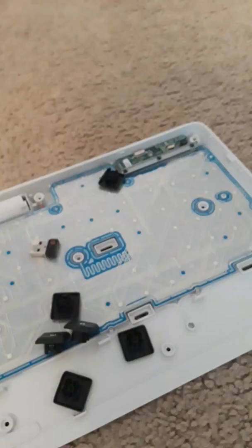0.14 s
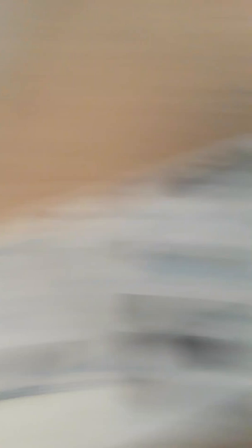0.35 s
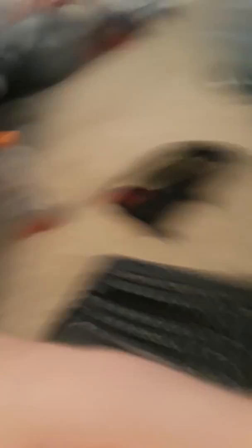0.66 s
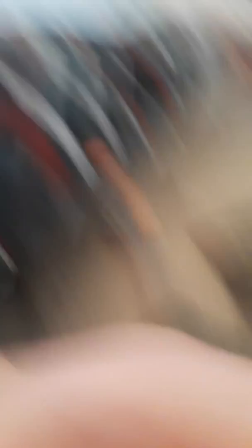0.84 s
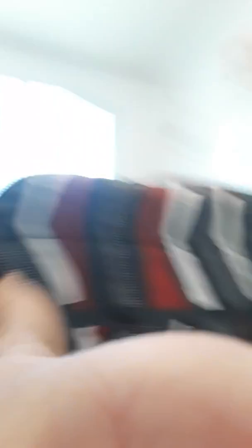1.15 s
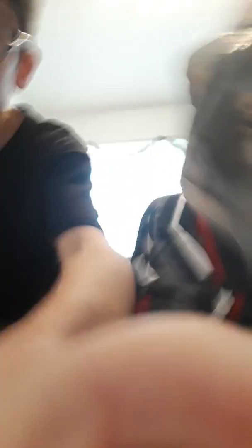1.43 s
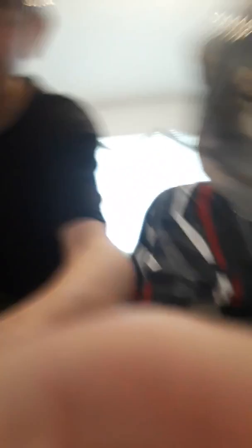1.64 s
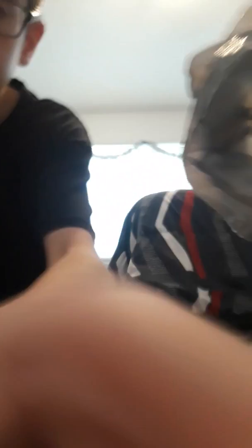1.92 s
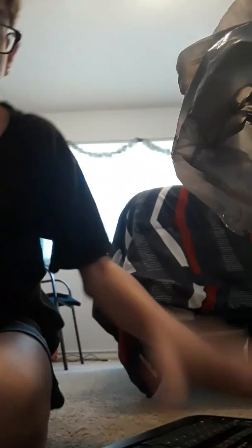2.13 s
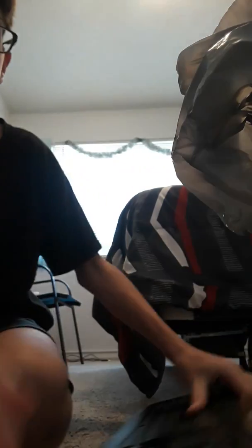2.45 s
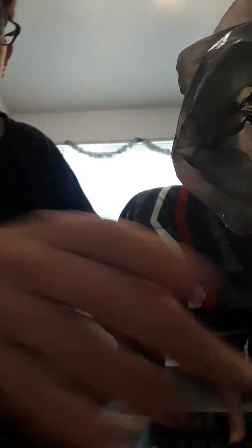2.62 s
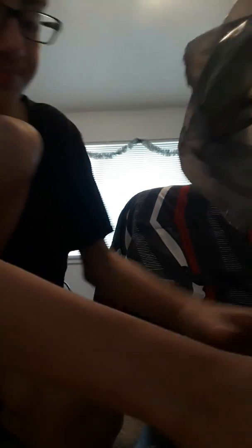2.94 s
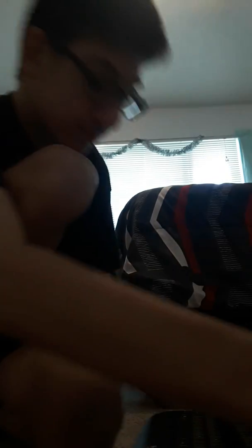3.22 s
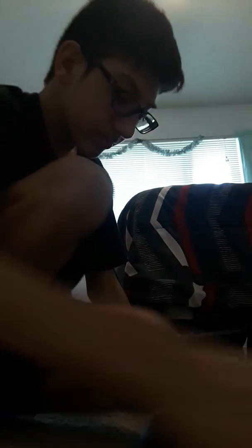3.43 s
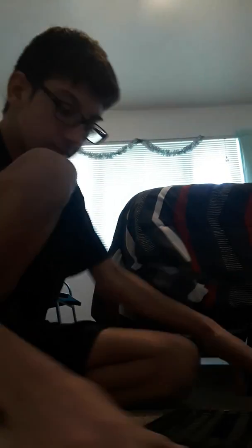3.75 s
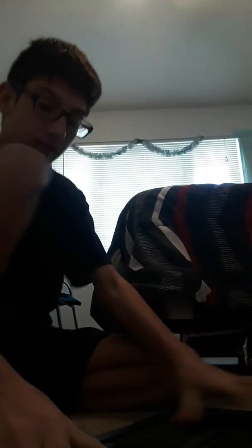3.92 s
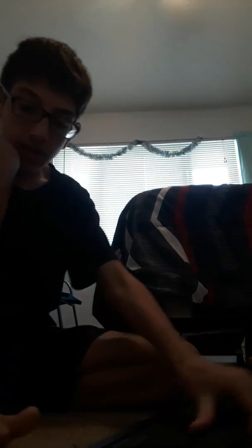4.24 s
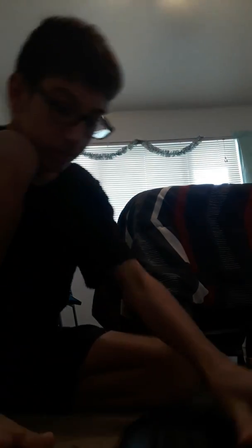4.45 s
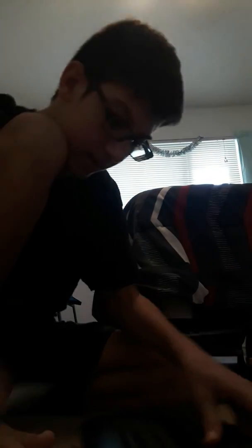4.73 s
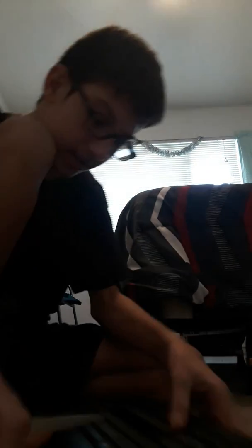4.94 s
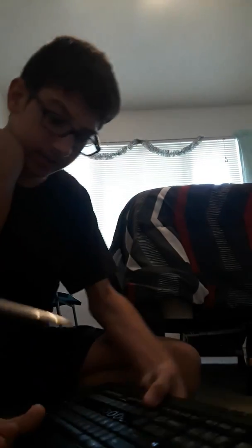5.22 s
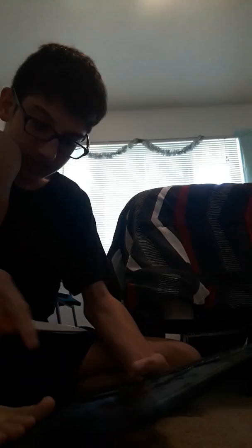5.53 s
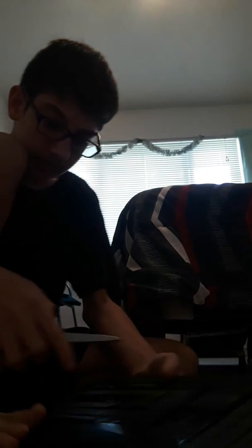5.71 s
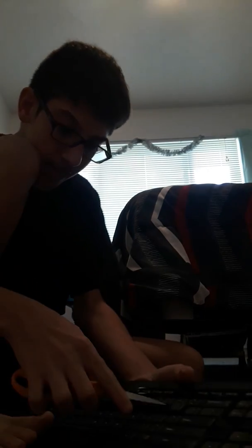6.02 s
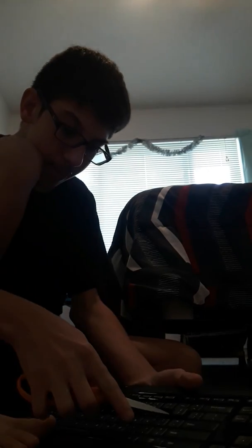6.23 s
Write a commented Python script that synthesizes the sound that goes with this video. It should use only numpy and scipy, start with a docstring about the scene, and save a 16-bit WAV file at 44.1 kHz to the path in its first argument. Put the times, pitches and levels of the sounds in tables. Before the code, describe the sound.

Close stereo sound of a loose-keyed keyboard on a bedroom floor: light plastic clicks, then a sharp bang and bright shower of rattles, a lull of small taps over soft rumble, another strong clatter with floor thumps, a run of fading ticks, a medium knock with a short rattle, and finally a short, dry scrape of a blade against a key. Short, dull room echoes.

```python
"""A low room rumble and soft hiss are there from the start, with a first plastic click almost at once.
A plastic keyboard is handled, set down and dragged over a carpet in a small bedroom; a cap is pried at.
Rumble and hiss are coloured noise. Each contact clicks a cap and knocks the ringing case; jolts rattle
the loose caps as showers of tiny collisions. Dull thumps come through the floor, and near the end a
blade scrapes briefly as dense noise. Two microphone ports a few centimetres apart hear it in stereo."""
import sys
import numpy as np
from scipy import signal
from scipy.fft import rfft, irfft
from scipy.io import wavfile

SR = 44100
rng = np.random.default_rng(int(sys.argv[2]) if len(sys.argv) > 2 else 0)


def to_wav(s):
    """Save 16-bit WAV."""
    ch = np.atleast_2d(s).T  # columns
    pcm = np.round(np.clip(ch, -1, 1) * 32767)  # PCM
    wavfile.write(sys.argv[1], SR, pcm.astype(np.int16))


N = 280917   # length in samples


def amp(db):
    """Turns a level in dB into a gain."""
    return 10 ** (np.asarray(db) / 20)


def rms_one(x):
    """Scales a sound to an average power of one."""
    return x / np.sqrt(np.mean(x ** 2) + 1e-20)


def at_hz(points, hz):
    """Reads a frequency table between its points, with octaves equally wide."""
    table = np.array(points)
    return np.interp(np.log(np.maximum(hz, 1)), np.log(table[:, 0]), table[:, 1])


def filtered(x, order, hz, kind):
    """Keeps the low, high or middle band of a sound."""
    return signal.sosfilt(signal.butter(order, hz, kind, fs=SR, output="sos"), x)


def shaped(x, points):
    """Colours a sound by a dB table without smearing it ahead in time (minimum phase, unit power gain)."""
    size = 2048
    cepstrum = irfft(np.log(amp(at_hz(points, np.fft.rfftfreq(size, 1 / SR)))))
    # folding the second half onto the first makes the filter act as early as it can
    cepstrum[1:size // 2] *= 2
    cepstrum[size // 2 + 1:] = 0
    taps = irfft(np.exp(rfft(cepstrum)))
    return signal.oaconvolve(x, taps[None] / np.sqrt(np.sum(taps ** 2)), axes=1)[:, :N]


def sides(pan_db):
    """Gives left and right gains; a positive level difference favours the left."""
    return amp(np.array([[.5], [-.5]]) * pan_db)


def drift(rate):
    """Wanders slowly by chance: random points, so many per second, joined by lines."""
    knots = rng.standard_normal(2000)
    return np.interp(np.arange(N) * rate / SR, np.arange(len(knots)), knots)


# Colour of the rumble: [f/Hz, level/dB per Hz, relative]
RUMBLE_COLOUR = [(15, -52), (25, -31), (48, -16.5), (156, -2.5), (200, -6.5), (252, -2.5), (318, -1),
                 (417, -9.5), (578, -16), (715, -19.5), (2500, -62.5), (3250, -86), (5500, -120)]
# How far the rumble leans to one side: [f/Hz, left-right level/dB]
RUMBLE_SIDE = [(60, 2), (150, -0.5), (380, -4.5), (950, -13.5), (2380, 7), (5980, 0.5), (15000, -3.0)]
# How alike the two ports hear it: [f/Hz, likeness from 1 (same) through 0 (unrelated) to -1 (opposite)]
RUMBLE_LIKENESS = [(60, 0.91), (300, 1), (640, 0.2), (1400, -0.093), (3000, 0.01)]
# Slow course of the rumble: [t/s, level/dB]
RUMBLE_COURSE = [(0.0, -49), (0.74, -47.5), (1.1, -50.5), (1.58, -55), (2.31, -55.5), (2.52, -50.5),
                 (3.95, -48.5), (4.38, -50), (5.45, -48.5), (6.37, -49)]


def rumble():
    """Low noise of the house in half-octave bands, each with its own flicker, lean and likeness."""
    out = 0
    edges = 25 * 2 ** np.arange(0, 7, .5)
    white = rng.standard_normal((2, 2, N))
    for k, (low, high) in enumerate(zip(edges, edges[1:])):
        common, opposite = filtered(white[k % 2], 2, [low, high], "band")   # neighbours use other noise
        hz = np.sqrt(low * high)
        alike = np.clip(at_hz(RUMBLE_LIKENESS, hz), -1, 1)
        pair = np.sqrt(1 + alike) * common + np.sqrt(1 - alike) * opposite * [[1], [-1]]
        flicker_db = 3.1 * drift(17.0)
        gain = amp(at_hz(RUMBLE_COLOUR, hz) + flicker_db) * sides(at_hz(RUMBLE_SIDE, hz))
        out = out + gain * pair
    level_db = np.interp(np.arange(N) / SR, *np.transpose(RUMBLE_COURSE))
    return amp(level_db) * rms_one(out)


# Colour of the microphone hiss: [f/Hz, level/dB per Hz, relative]
HISS_COLOUR = [(880, -41), (1500, -9.5), (1590, -9), (3280, -14.5), (9370, -15.5), (12200, 0), (13400, -24),
               (14800, -7), (16000, -37.5)]


def hiss():
    """Steady coloured microphone noise, unrelated at the two ports."""
    return amp(-68.5) * shaped(rng.standard_normal((2, N)), HISS_COLOUR)


def ring(x, hz, t60):
    """Lets a push ring like a struck bar: a unit click starts a fading sine of height 1."""
    r, w = amp(-60 / (t60 * SR)), 2 * np.pi * hz / SR
    return signal.lfilter([0, np.sin(w)], [1, -2 * r * np.cos(w), r * r], x + 1e-18)


def add(track, s, shape):
    """Adds a stereo shape from time s on."""
    i = int(np.clip(round(s * SR), 0, N - 1))
    track[:, i:i + shape.shape[1]] += shape[:, :N - i]


def swell(rise, hold, t60):
    """Rises, holds, then fades by 60 dB in t60 seconds."""
    t = np.arange(SR // 3) / SR
    return np.clip(t / rise, 0, 1) * amp(-60 * np.maximum(t - rise - hold, 0) / t60)


BOARD_PAN_DB, CASE_PAN_DB = 4, -1   # the board lies to the left; the case rings a little stronger right
# Ringing modes of the case: [f/Hz, level/dB, fade by 60 dB/s]
CASE_MODES = [(361, -2.5, 0.042), (459, -2.5, 0.023), (550, -3, 0.034), (666, -5, 0.031), (761, 5, 0.024),
              (899, -2, 0.039), (1102, -8, .02), (1450, -0.5, 0.0027)]
# Contacts with the board: [t/s, click level/dB, knock level/dB, bright part level/dB over the click,
# chatter level/dB over the click, knock centre f/Hz, cap note f/Hz]
TOUCHES = [(0.0034, -32, -41, -13, -4.5, 890, 2820), (0.0874, -28.5, -34.5, -3.5, -12, 930, 7100),
           (0.105, -26, -34, -24, -4.5, 1360, 2180), (0.137, -31, -32, 1, -9, 940, 2160),
           (0.1556, -22.5, -39, -10, -19, 867, 1930), (0.2604, -28, -25.5, -14, -0.5, 550, 2400),
           (0.373, -39, -52, -20, -16, 533, 2400), (0.477, -24.5, -28.5, -6.5, -12, 700, 1360),
           (0.5125, -22, -31, -9, -22.5, 520, 5240), (0.5533, -32.5, -33, -17, -14, 810, 1420),
           (0.6459, -54, -48, -7, -10, 799, 1530), (0.7031, -42, -22.5, -10, 3, 604, 1290),
           (0.718, -26.5, -40, -30, -6, 743, 2200), (0.758, -10, -32, -0.5, -19.5, 830, 8320),
           (0.845, -19, -30, -35, -24, 950, 1580), (0.8927, -23, -38.5, -9, -11, 786, 7800),
           (0.907, -26.5, -41, 1, -13, 805, 6650), (0.9286, -35.5, -37.5, -21, -1, 880, 2270),
           (1.0154, -36.5, -53, -11, -11, 511, 2100), (1.0415, -26, -42, -6.5, -10.5, 610, 8150),
           (1.0767, -4.5, -16.5, -20, -15, 400, 8500), (1.0875, -8.5, -30, -20, -6.5, 560, 4410),
           (1.096, -13, -18, -8, -18, 400, 4500), (1.1318, -13.5, -33, -4, -4, 431, 6550),
           (1.138, -15, -17, -5, -20, 450, 7000), (1.243, -17, -30.5, 0.5, -24, 800, 6860),
           (1.354, -22.5, -37, -19, -9, 867, 1300), (1.3681, -26.5, -39.5, 6, -14.5, 945, 7050),
           (1.3942, -21.5, -41, -0.5, -40, 760, 6640), (1.49, -39, -44, -15, -11, 410, 2630),
           (1.524, -39.5, -34, -14, -9, 390, 2480), (1.5424, -44, -70, -2.5, -7, 506, 1610),
           (1.5725, -27.5, -44, -4.5, -17, 886, 8300), (1.639, -32, -58, -15, -11, 1140, 2210),
           (1.935, -34.5, -37.5, -21, -8.5, 738, 1560), (1.988, -39, -44, -23, -14, 775, 1300),
           (2.2563, -46.5, -46.5, -1.5, -9, 860, 5000), (2.408, -53.5, -44.5, -7, -10, 900, 1300),
           (2.4843, -43, -38.5, -10, -7, 805, 1640), (2.5135, -37, -40.5, -18, -5.5, 748, 2260),
           (2.5264, -36.5, -32.5, -24, -6, 563, 1820), (2.81, -49.5, -53, -14, -6, 874, 2160),
           (2.8253, -38, -37, -8, -12, 856, 2150), (3.274, -36.5, -34.5, -19, -5.5, 744, 1280),
           (3.317, -42, -41, -15, -16, 810, 1320), (3.344, -35.5, -42, -5, -16, 560, 4640),
           (3.356, -35, -29.5, -27, -6, 625, 2140), (3.4585, -43.5, -52, -3.5, -7.5, 423, 4070),
           (3.5992, -25, -48, 0, -26, 676, 4450), (3.6134, -31.5, -49, -9, -6, 430, 4100),
           (3.638, -25.5, -37, -8, -7.5, 813, 5600), (3.678, -14, -15.5, -17, 2, 460, 2100),
           (3.735, -13, -20.5, 3.5, -21, 600, 7100), (3.755, -9, -29.5, -1, -28.5, 800, 7560),
           (3.859, -14, -29.5, -1, -16, 709, 6500), (3.9171, -35, -38, -11, -20, 740, 5220),
           (3.9632, -23.5, -37.5, -2, -15.5, 845, 7050), (4.0269, -25.5, -47, -9, -24, 1100, 4550),
           (4.059, -24.5, -40.5, -9.5, -10.5, 804, 2420), (4.0858, -25, -36.5, -11, -10.5, 805, 2310),
           (4.093, -24, -42, -12, -17, 800, 4970), (4.134, -33, -44, -12, -11.5, 525, 8000),
           (4.1664, -24.5, -40, -13, -14, 880, 5030), (4.1732, -21, -32, -11, -12, 770, 2220),
           (4.207, -20, -43, -5, -20, 864, 5410), (4.2434, -27, -39, -7.5, -9.5, 880, 8060),
           (4.3133, -27.5, -42, -26, -15, 1210, 1770), (4.3352, -26, -32.5, -35, -10, 755, 1510),
           (4.351, -41, -35.5, -20, -5.5, 600, 1500), (4.3924, -43.5, -49, -13, -0.5, 487, 1370),
           (4.4926, -53, -52, -2, -5.5, 550, 1350), (4.7222, -24.5, -38, -5.5, -16, 721, 2430),
           (4.8585, -39.5, -71, -6.5, -11.5, 460, 8450), (4.9468, -21.5, -34.5, -16, -10.5, 740, 3260),
           (5.034, -17, -32, -11.5, -18.5, 460, 4760), (5.2626, -38, -47, -27, -4.5, 1146, 1324),
           (5.274, -39.5, -46, -10, -8, 1200, 2490), (5.291, -26, -43, -25, -19, 1300, 1400),
           (5.2994, -24, -36, -31, -18, 1330, 1340), (5.329, -26, -31, -29, -19, 1405, 1400),
           (5.3654, -19, -20, -11, -3, 423, 2500), (5.4007, -28, -46, -10.5, -26.5, 956, 7660),
           (5.409, -25, -36, -8, -27, 800, 3000), (5.425, -17, -34, 2, -24, 850, 6100),
           (5.5557, -32.5, -52.5, -10, -8.5, 435, 2600), (5.567, -36.5, -57, -8, -8, 435, 2320),
           (5.641, -44.5, -57.5, -10, -11.5, 537, 2350), (5.7392, -43, -51, 10.5, -15, 425, 8800),
           (5.7808, -34, -46.5, 1, -8, 560, 2280), (5.795, -32.5, -50, -16, -12.5, 554, 2340),
           (5.8806, -38.5, -59, -10, -8, 589, 3420), (5.9028, -41.5, -59, -9, -11, 423, 2860),
           (5.9407, -27, -47, -6, -10, 1180, 4110), (5.9654, -35.5, -40.5, -11, -21, 474, 2530),
           (6.0314, -32, -38.5, -7.5, -8, 400, 2280)]


def contacts():
    """Each touch clicks a cap, strikes the case modes near its centre and leaves caps and case chattering."""
    click_s, chatter_t60_s, note_t60_s = 0.0011, .14, .01
    note_db, buzz_db = -7.5, -8   # cap note against the click's peak; case buzz under the knock
    off_centre_db = -40.5   # for a mode one octave from the knock centre
    power, clicks, blows = np.zeros((3, 2, N)), np.zeros((2, 2, N)), np.zeros((len(CASE_MODES), 2, N))
    u = np.arange(600) / SR / click_s
    for s, click_db, knock_db, top_db, chatter_db, knock_hz, cap_hz in TOUCHES:
        pan_db = BOARD_PAN_DB + 0.5 * rng.standard_normal()
        burst = rng.standard_normal(len(u)) * u * np.exp(-u)
        note = ring(burst, cap_hz, note_t60_s)
        note = amp(note_db) * note * np.abs(burst).max() / np.abs(note).max()
        click = amp(click_db) * (burst + note) * sides(pan_db)
        add(clicks[0], s, click)
        add(clicks[1], s, click * amp(top_db))
        for track, (hz, db, _) in zip(blows, CASE_MODES):
            reach_db = off_centre_db * np.log2(hz / knock_hz) ** 2 + 1.2 * rng.standard_normal()
            add(track, s, amp(knock_db + db + reach_db) * sides(CASE_PAN_DB))
        chatter = (amp(click_db + chatter_db) * swell(.0015, 0, chatter_t60_s) * sides(pan_db)) ** 2
        buzz = (amp(knock_db + buzz_db) * swell(.002, 0, chatter_t60_s) * sides(CASE_PAN_DB)) ** 2
        add(power[0], s, chatter)
        add(power[1], s, chatter * amp(2 * top_db))   # doubled because this is power
        add(power[2], s, buzz)
    return power, clicks, blows


# Jolts that shake all caps at once: [t/s, rise and hold together/s, fade by 60 dB/s,
# rattle drive level/dB, case drive level/dB, bright part level/dB over the rattle]
SHAKES = [(0.13, 0.024, 0.13, -34.5, -57, -3), (0.741, .017, 0.12, -29.5, -35.5, -5),
          (1.077, 0.0044, 0.14, -21.5, -19.5, 2), (1.115, 0.061, 0.15, -22.5, -28.5, -0.5),
          (1.18, 0.018, 0.38, -23.5, -35.5, -23.5), (1.241, .019, 0.11, -21, -27, 1),
          (1.324, 0.026, 0.11, -43, -51, 1), (2.373, 0.039, 0.12, -68.5, -48.5, -5.5),
          (2.503, 0.023, .16, -65.5, -42.5, -16), (3.352, 0.041, 0.084, -41.5, -48, -8),
          (3.64, .034, .2, -60, -59, -11), (3.677, 0.011, 0.21, -24.5, -18.5, 3),
          (3.722, 0.024, 0.15, -16.5, -30, -2), (3.803, 0.048, .15, -31.5, -36.5, -5),
          (3.857, 0.013, 0.14, -19.5, -28, -2), (5.274, 0.2, .2, -44, -51.5, -33.5),
          (5.348, 0.088, 0.071, -25.5, -33, -12), (5.379, 0.051, 0.074, -24.5, -47, 2)]


def jolts():
    """Power of the shaking of the caps, their bright part and the case."""
    power = np.zeros((3, 2, N))
    rise_share = 0.48
    for s, length, t60, rattle_db, case_db, top_db in SHAKES:
        shape = swell(rise_share * length, (1 - rise_share) * length, t60)
        levels_db = (rattle_db, rattle_db + top_db, case_db)
        for track, db, pan_db in zip(power, levels_db, (BOARD_PAN_DB, BOARD_PAN_DB, CASE_PAN_DB)):
            add(track, s, (amp(db) * shape * sides(pan_db)) ** 2)
    return power


def grains(per_s, spread_db):
    """Tiny collisions at random moments, of uneven size; unit power."""
    sizes = amp(spread_db * np.minimum(rng.exponential(1, N), 5)) * rng.choice([-1, 1], N)
    return rms_one(sizes * (rng.random(N) < per_s / SR))


def spread_grains(per_s, spread_db):
    """Collisions all over the board: partly the same at both ports, partly each port's own."""
    share = 0.46   # share of the power heard alike
    own = np.array([grains(per_s, spread_db), grains(per_s, spread_db)])
    return np.sqrt(share) * grains(per_s, spread_db) + np.sqrt(1 - share) * own


def patchy(x, patch_db):
    """Other caps collide from moment to moment, so each band comes and goes by itself."""
    edges = 500 * 2 ** np.arange(0, 5.1, .5)
    out = 0
    for k, pair in enumerate(zip(edges, edges[1:])):
        band = filtered(x, 2, pair, "band") * (-1) ** k   # every other band is flipped
        out = out + band * amp(patch_db * drift(80.0))
    return rms_one(out)


def rustle(shake):
    """Hands and sleeves move on after the caps are shaken: soft dense collisions that linger."""
    linger = amp(-120 / (0.48 * SR))   # power falls by 60 dB in 0.48 s
    moving = np.sqrt(signal.lfilter([1 - linger], [1, -linger], shake ** 2))
    return (amp(-19) * moving + amp(-91)) * spread_grains(6000, spread_db=1.0)


# Colour of many small caps together: [f/Hz, level/dB per Hz, relative]
CAP_COLOUR = [(470, -28), (800, -7.5), (1400, -5.5), (1920, -4.5), (2320, -1), (3010, -4), (3250, -2.5),
              (5290, -2), (5850, -5), (7990, -2.5), (9520, -7.5), (14200, -6), (15900, -26.5)]


def keyboard():
    """Clicks and collisions sound through the colour of the caps and the modes of the case."""
    power, clicks, blows = contacts()
    shake = np.sqrt(power + jolts())   # shaking adds in power
    clumps = amp(2.5 * drift(220.0))
    hits = patchy(spread_grains(5000, spread_db=3), patch_db=4) * clumps
    body, top = shake[:2] * hits + clicks + rustle(shake[0])
    split_hz = 4800   # the bright part takes over above this
    caps = shaped(filtered(body, 2, split_hz, "low") - filtered(top, 2, split_hz, "high"), CAP_COLOUR)
    drumming = shake[2] * spread_grains(1300, spread_db=8.0) * amp(-30.0)
    case = 0
    for blow, (hz, db, t60) in zip(blows, CASE_MODES):
        case = case + ring(blow + amp(db) * drumming, hz, t60)
    return caps + filtered(case, 4, 282, "high")   # the case radiates no deep bass


# How long the bedroom echoes last: [f/Hz, fade by 60 dB/s]
ROOM_FADE = [(300, 0.13), (1000, 0.22), (4000, 0.16), (12000, 0.11)]


def bedroom(x):
    """Dense echoes that die band by band, other ones at each port."""
    t = np.arange(SR // 3) / SR
    edges = 150 * 2 ** np.arange(0, 7.1)
    echoes = 0
    for low, high in zip(edges, edges[1:]):
        band = filtered(rng.standard_normal((2, len(t))), 2, [low, high], "band")
        echoes = echoes + band * amp(-60 * t / at_hz(ROOM_FADE, np.sqrt(low * high)))
    echoes = echoes * (t > .003)   # first echo after 3 ms
    energy = np.mean(np.sum(echoes ** 2, axis=1))
    return signal.oaconvolve(x, echoes / np.sqrt(energy), axes=1)[:, :N]


# Bumps through the floor to the microphone: [t/s, drive level/dB, left-right level/dB, f/Hz]
FLOOR_BUMPS = [(1.078, -21.5, 16, 119), (1.138, -16.5, 18.5, 114.4), (1.522, -30, -8, 229),
               (3.681, -23, 17.5, 153), (3.739, -23.5, 7.5, 106.3), (5.37, -24.5, 7, 248)]


def thumps():
    """A soft push through the floor rings briefly and dully, stronger on one port."""
    out, soft = np.zeros((2, N)), np.hanning(100)
    push = np.pad(soft / soft.sum(), (0, SR // 5))
    for s, level_db, pan_db, hz in FLOOR_BUMPS:
        add(out, s, amp(level_db) * ring(push, hz, t60=0.03) * sides(pan_db))
    return filtered(out, 2, 60.0, "high")


# A blade slips along a cap close by: [t/s, rise/s, hold/s, fade by 60 dB/s, level/dB, left-right level/dB]
BLADE_SLIPS = [(6.239, 0.0079, 0.028, 0.035, -18.5, 4)]
# Colour of the scrape: [f/Hz, level/dB per Hz, relative]
BLADE_COLOUR = [(180, -34), (300, -14), (915, -9), (1610, -11), (2280, -1), (7820, -4), (9710, -10),
                (13100, -9.5), (16000, -27.5)]


def blade():
    """A short scrape of dense tiny slips that dies quickly, without room echo."""
    stroke = np.zeros((2, N))
    for s, rise, hold, t60, level_db, pan_db in BLADE_SLIPS:
        add(stroke, s, amp(level_db) * swell(rise, hold, t60) * sides(pan_db))
    return shaped(stroke * spread_grains(4000, spread_db=3.0), BLADE_COLOUR)


def scene():
    """Keyboard and blade, late at the left port, with room echoes and thumps over rumble and hiss."""
    background = rumble() + hiss()
    board = keyboard()
    near = board + blade()
    lag = round(.00014 * SR)   # 0.14 ms between the ports
    near[0] = np.concatenate([np.zeros(lag), near[0, :N - lag]])
    return near + amp(-9.5) * bedroom(board) + thumps() + background


def record(dry):
    """Loud peaks are rounded and the treble is cut steeply, gone from 16400 Hz up."""
    rounded = .94 * np.tanh(dry / .94)
    return signal.sosfilt(signal.cheby2(12, 70, 16400, fs=SR, output="sos"), rounded)


dry = scene()
out = record(dry)
to_wav(out)
```